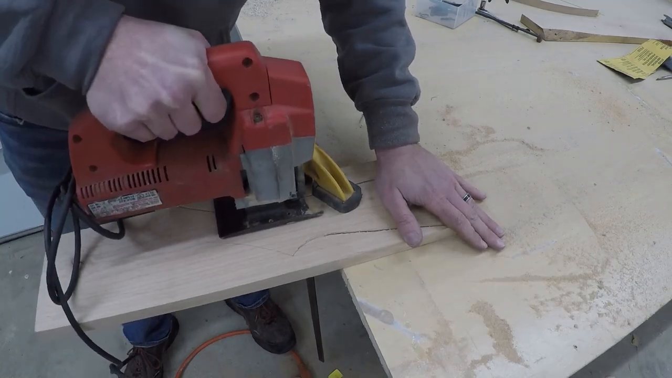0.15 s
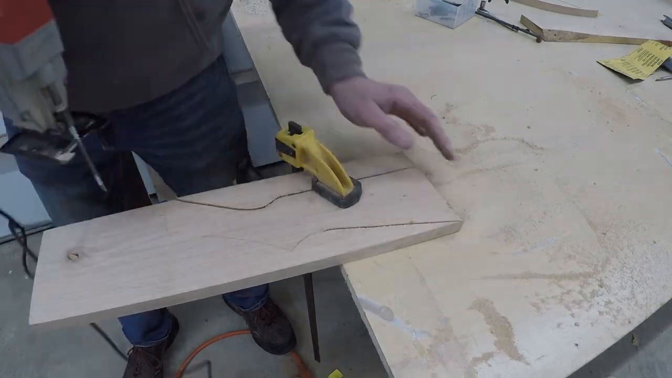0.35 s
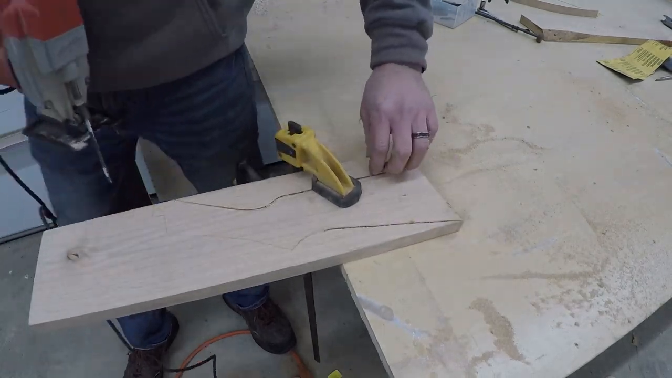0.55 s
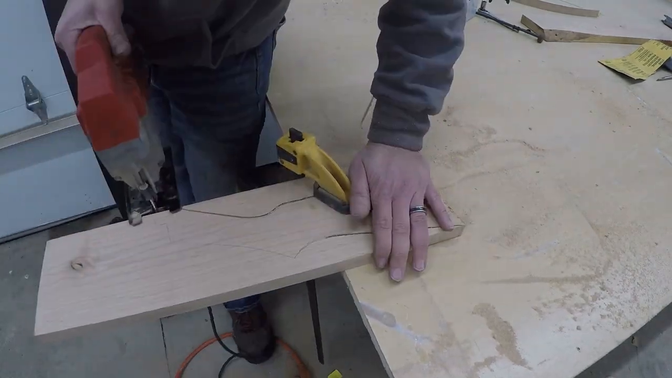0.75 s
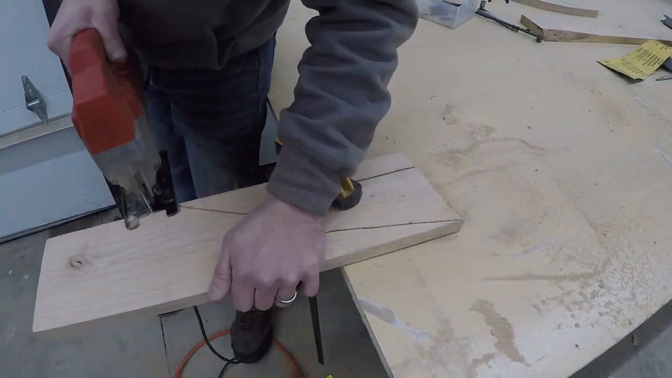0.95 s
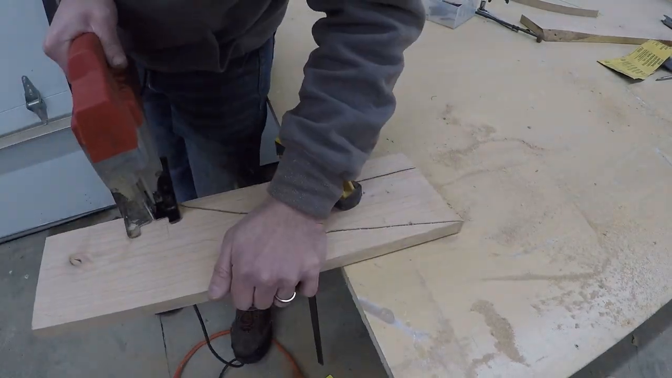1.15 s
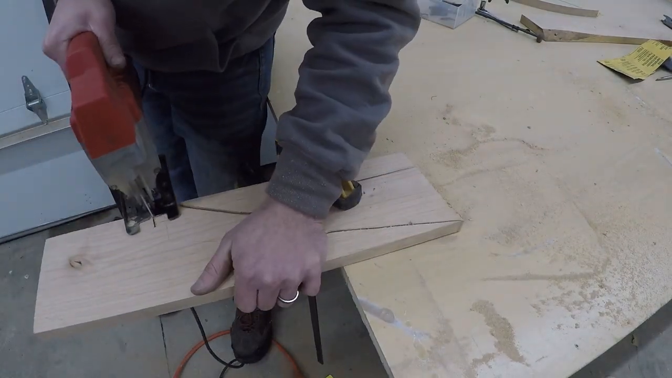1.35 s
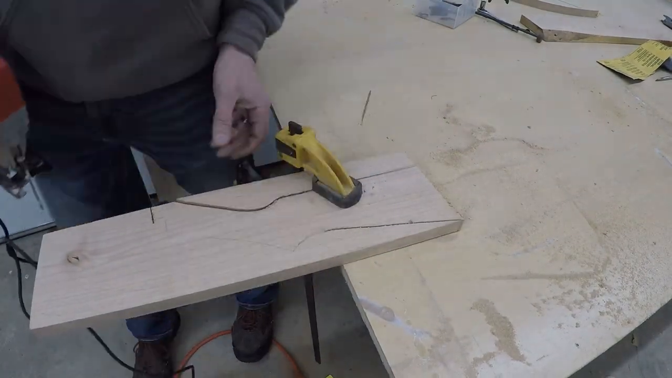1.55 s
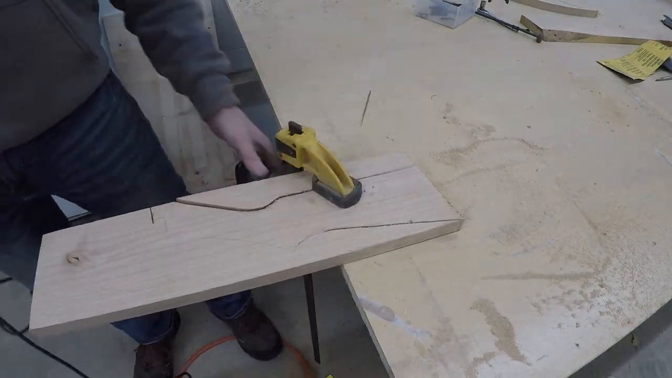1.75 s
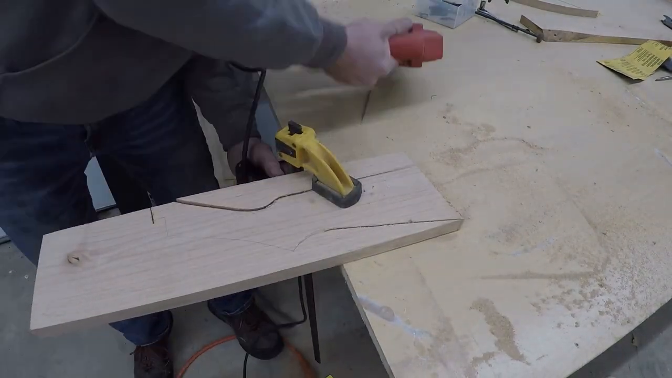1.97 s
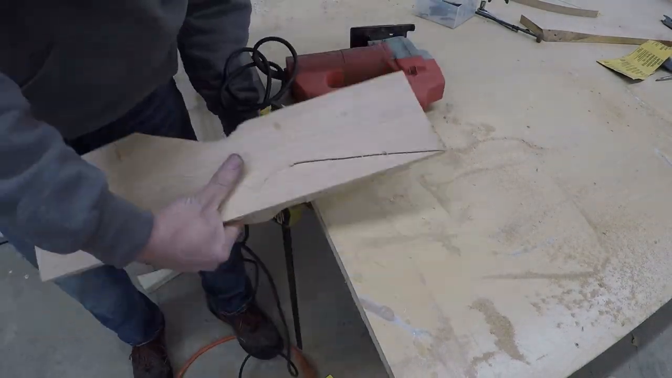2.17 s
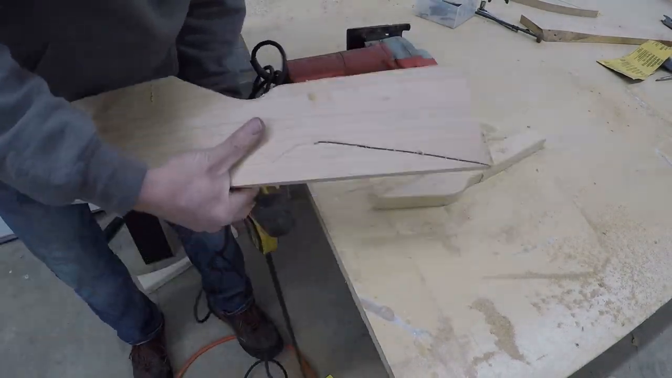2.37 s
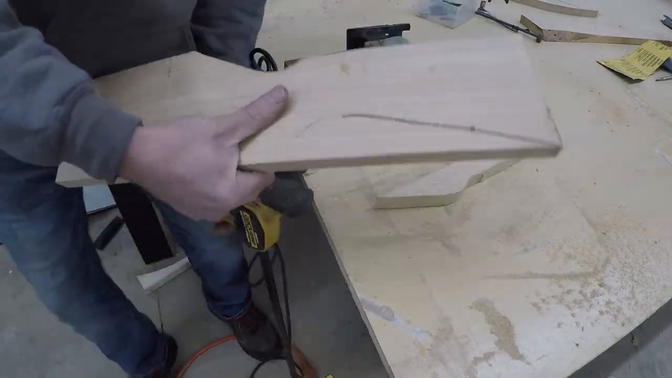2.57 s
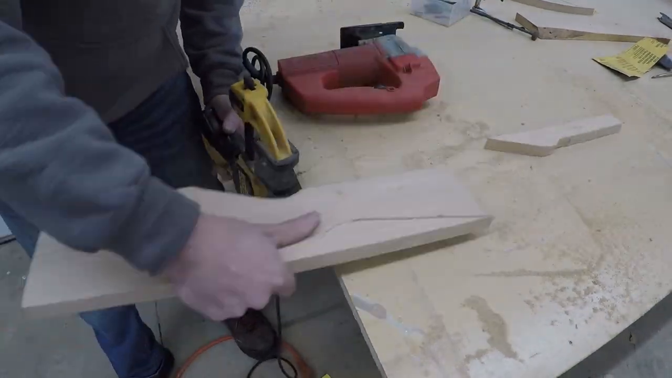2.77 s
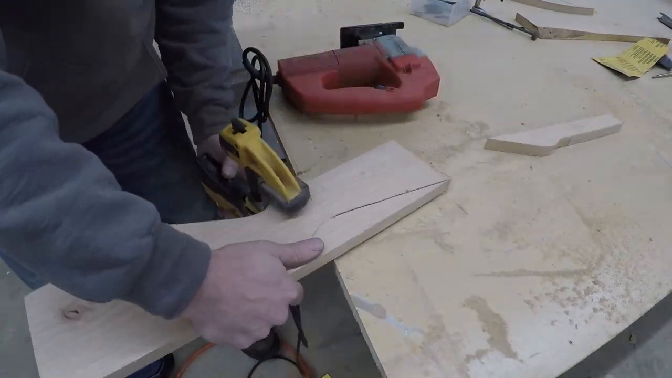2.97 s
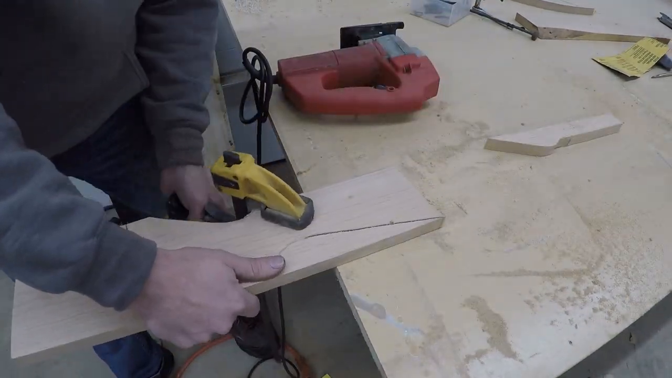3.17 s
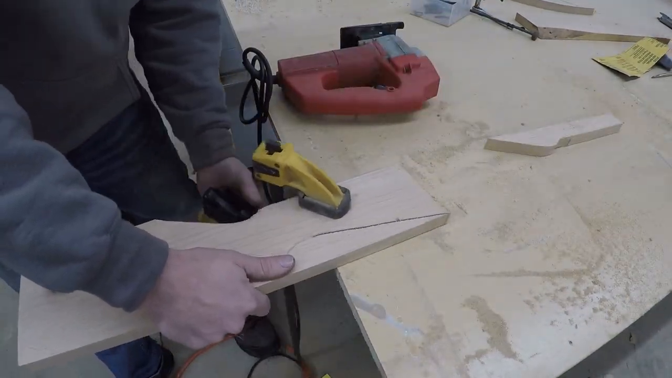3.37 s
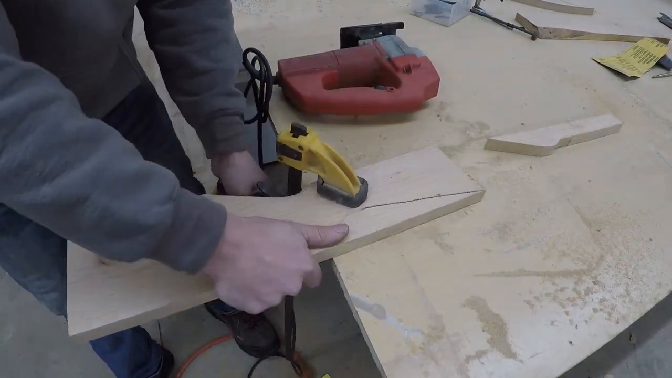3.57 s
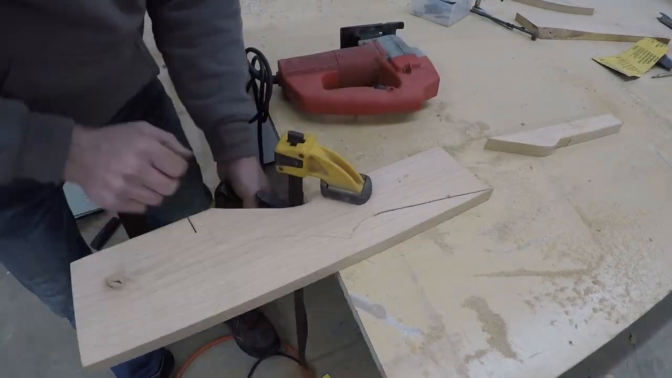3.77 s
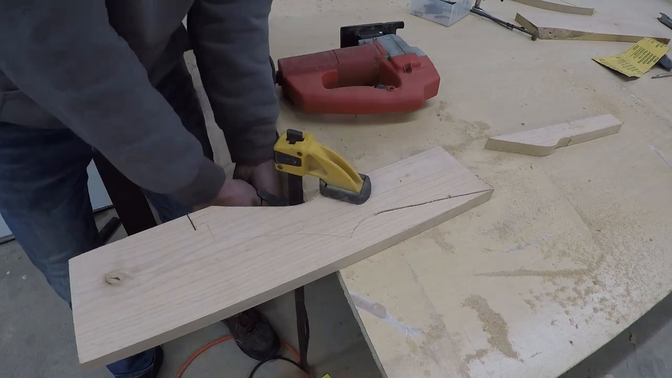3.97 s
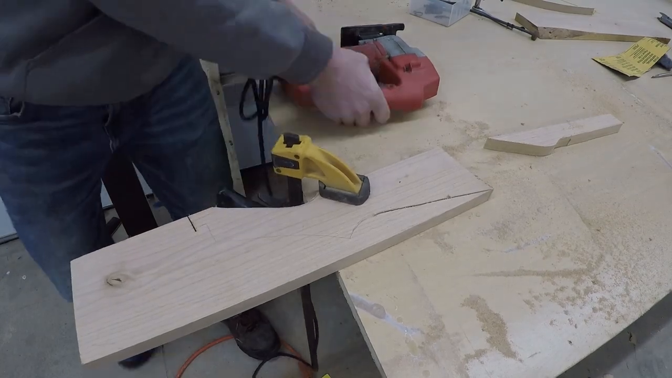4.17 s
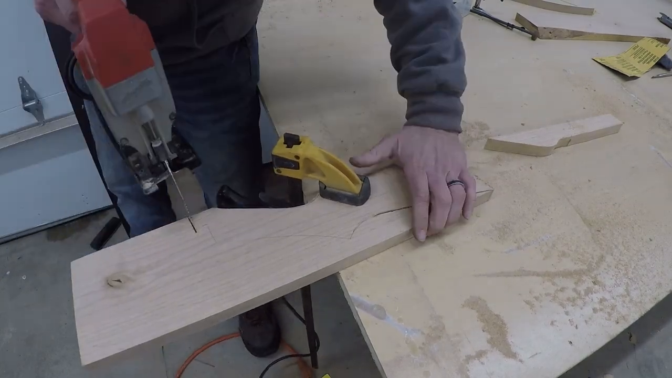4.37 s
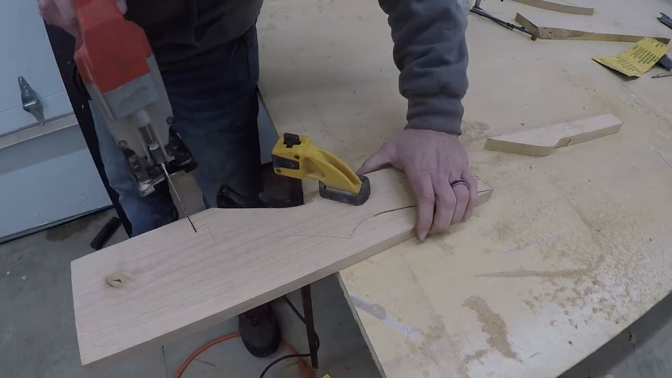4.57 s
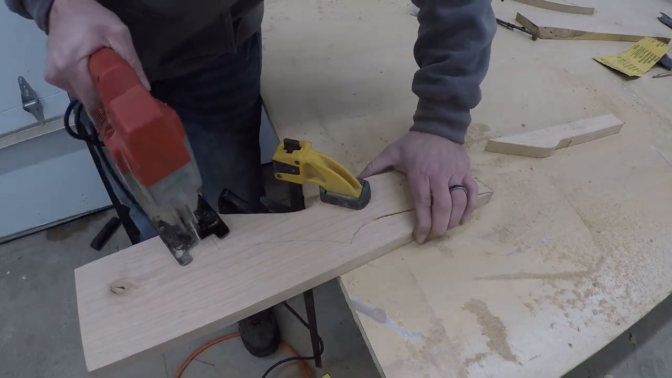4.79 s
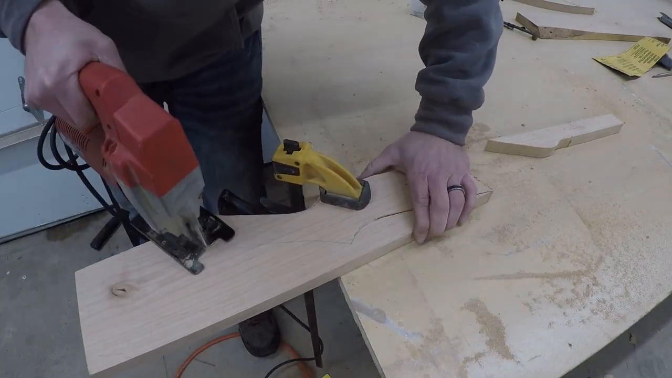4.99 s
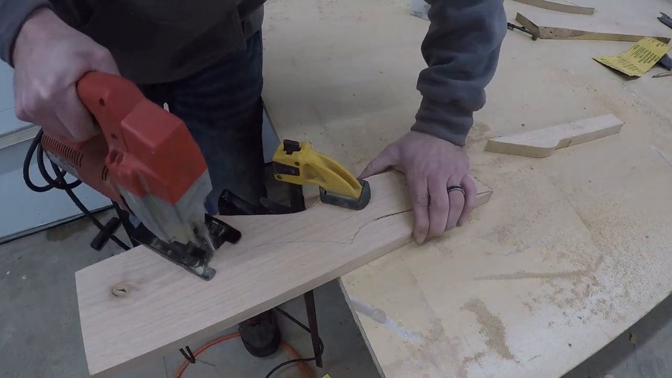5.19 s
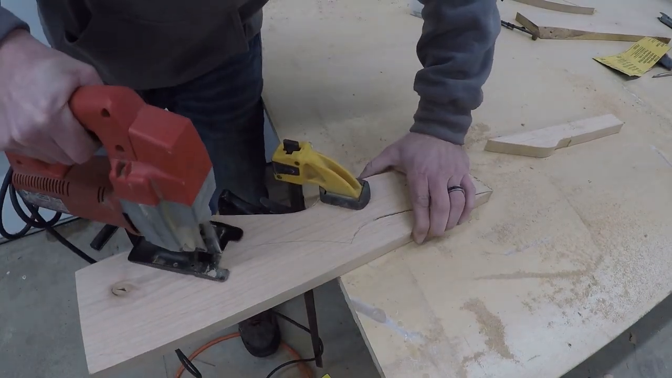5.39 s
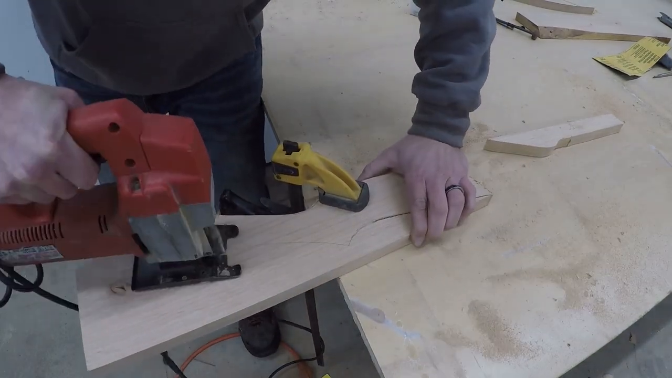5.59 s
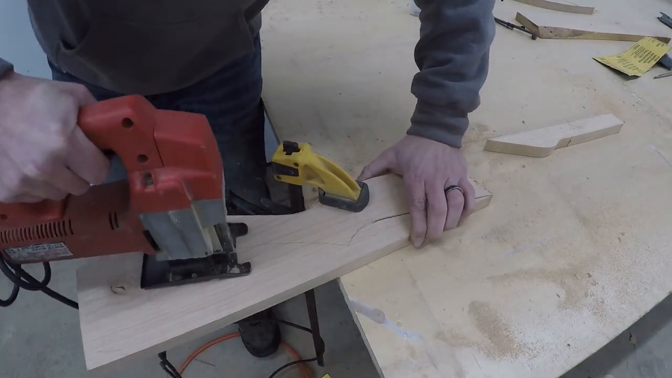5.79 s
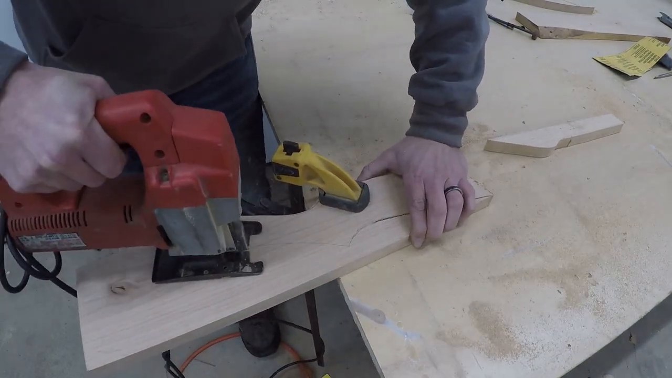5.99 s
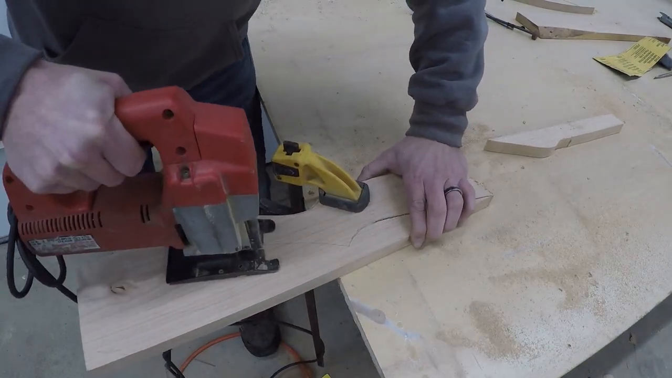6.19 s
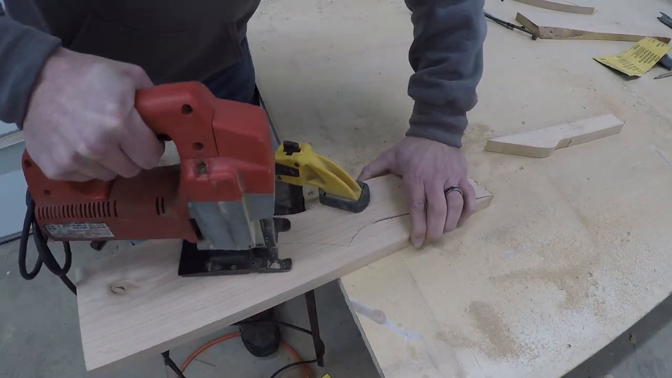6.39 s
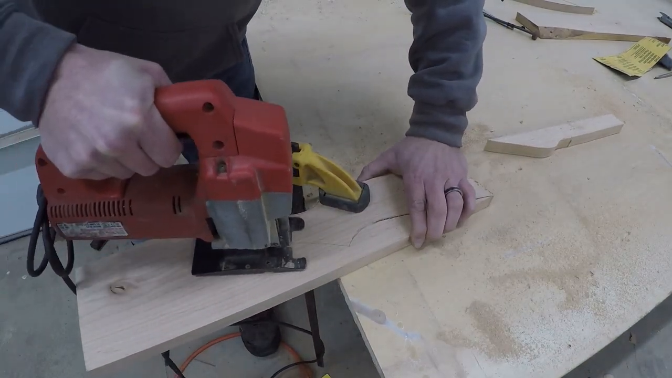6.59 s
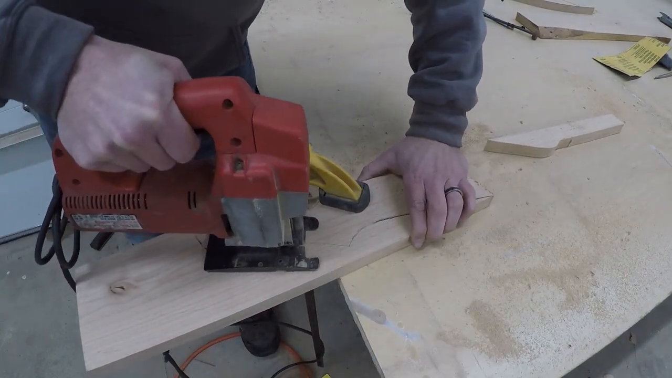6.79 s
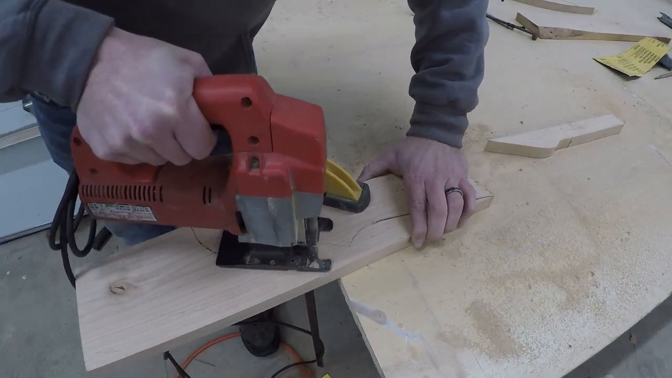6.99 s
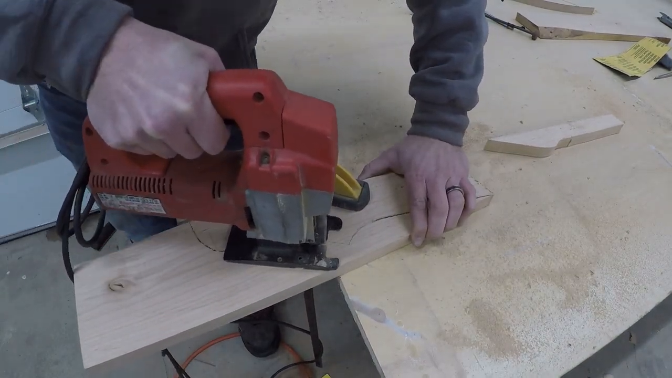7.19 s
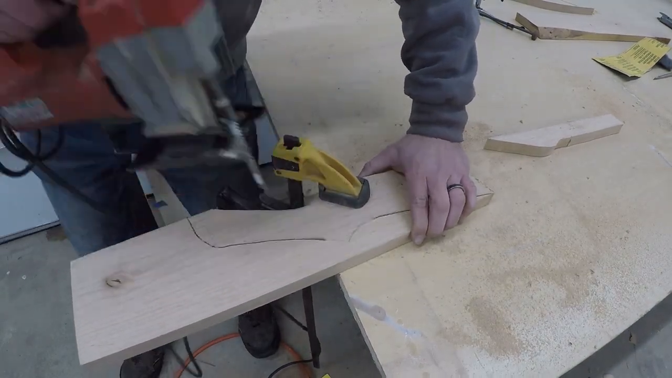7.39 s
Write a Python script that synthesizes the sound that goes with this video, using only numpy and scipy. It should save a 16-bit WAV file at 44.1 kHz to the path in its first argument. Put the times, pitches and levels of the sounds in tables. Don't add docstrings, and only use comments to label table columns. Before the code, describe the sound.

Close, dry, mono-like workshop sound, speeded up. A jigsaw is already cutting, a buzzing tone near 360 hertz with strong overtones and bright hiss; it is released at 0.2 s and slides down, with a firm wooden bump at 0.34. Light touches and clicks lead to a short cut from 1.0 to 1.44, coasting down until 1.65. Small clicks follow, then two loud hard knocks near 2.05 as the saw is put down. Clamp clicks come at 2.3, a heavy padded board thud at 2.66, ringing metal ticks around 2.8, then rustling, sliding wood and scattered knocks to 4.7, with a tiny rough squeak at 4.0 and a faint distant engine drone from about 3.7. The last cut starts at 4.77, snags harshly and sags in pitch around 5.3 to 5.75, then steadies into an even buzz. Released at 7.3, it drops away with a small bump near 7.4.

```python
import sys
import numpy as np
from scipy import signal
from scipy.fft import rfft, irfft, next_fast_len
from scipy.io import wavfile

SR = 44100
rng = np.random.default_rng(int(sys.argv[2]) if len(sys.argv) > 2 else 0)


def linear_from_db(decibels):
    return 10 ** (np.asarray(decibels, float) / 20)


def int16_out(signal):
    q = np.round(np.clip(np.atleast_2d(signal).T, -1, 1) * 32767)
    wavfile.write(sys.argv[1], SR, q.astype(np.int16))


N = 328545
TIME = np.arange(N) / SR
BAR_HZ, BAR_WIDTH_HZ = 1466, 24


def rms_one(x):
    return x / np.sqrt(np.mean(x ** 2) + 1e-20)


def in_time(rows):
    s, *columns = np.transpose(rows)
    return [np.interp(TIME, s, c) for c in columns]


def bumps(rows):
    rows, coarse = np.array(rows), TIME[::32]
    bells = np.exp(-((coarse - rows[:, :1]) / rows[:, 1:2]) ** 2)
    return [np.interp(TIME, coarse, c) for c in rows[:, 2:].T @ bells]


def drift(rate):
    r = np.exp(-80 * np.pi * rate / SR)
    white = rng.standard_normal(N // 40 + 2002)
    slow = signal.lfilter([1], [1, -2 * r, r * r], white)[2000:]
    return np.interp(np.arange(N) / 40, np.arange(len(slow)), rms_one(slow))


def coloured(x, spectrum):
    hz, level_db = np.transpose(spectrum)
    size = next_fast_len(N)
    grid = np.log(np.arange(size // 2 + 1) * SR / size + 1)
    gain = linear_from_db(np.interp(grid, np.log(hz), level_db, -90, -90))
    return rms_one(irfft(rfft(x, size) * gain, size)[:N])


def resonance(x, hz, width_hz):
    r = np.exp(-np.pi * width_hz / SR)
    feedback = [1, -2 * r * np.cos(2 * np.pi * hz / SR), r * r]
    return signal.lfilter(np.array([1, 0, -1]) * (1 - r * r) / 2, feedback, x)


# t/s, f/Hz, level/dB
ENGINE_PASSES = [
    [(3.66, 308, -69), (3.814, 280.0, -61), (4.12, 309, -66)],
    [(4.9, 295, -61), (5.2, 268, -58), (5.52, 235, -58)],
]
# f/Hz, level/dB
ROOM_COLOUR = [(18, -48), (80, -8), (153, 13.5), (540, 3), (666, -10.5), (889, -16), (1190, -37),
               (1500, -19), (16000, -26)]


def workshop():
    drone = 0
    for rows in ENGINE_PASSES:
        hz, level_db = in_time(rows)
        passing = np.clip(np.minimum(TIME - rows[0][0], rows[-1][0] - TIME) / 0.045, 0, 1)
        turn = 2 * np.pi * np.cumsum(hz) / SR
        drone += passing * linear_from_db(level_db + 3 + 3.5 * drift(20)) * np.sin(turn)
    white = rng.standard_normal((2, N))
    hum = linear_from_db(-76) * rms_one(resonance(white[1], 965, 13))
    room = linear_from_db(-62.5 + 1.3 * drift(8)) * coloured(white[0], ROOM_COLOUR)
    return room + hum + drone


# t/s, level/dB
RUBBING = [(.38, -69.5), (1.0, -64), (1.75, -67), (2.7, -71.5), (2.95, -56.5), (3.25, -63.5), (3.62, -54.5),
           (3.72, -63.5), (4.1, -57), (4.4, -66), (4.62, -66), (4.75, -51)]
# t/s, half width/s, extra brightness/dB
DRY_SLIDES = [
    (.75, 0.23, 6),
    (1.6, 0.11, 9),
    (4.1, 0.21, 11.5),
    (4.76, 0.078, 14),
]


def rustle():
    low_db, high_db = in_time(RUBBING)[0], -75 + bumps(DRY_SLIDES)[0]
    grains = rng.standard_normal((2, N)) * linear_from_db(4.6 * drift(63))
    dull = [(120, -14), (350, 7), (680, -3), (1000, 0), (1500, -7.0), (2200, -13.0), (5000, -43.5)]
    low = linear_from_db(low_db - 1.5) * coloured(grains[0], dull)
    high = linear_from_db(high_db) * coloured(grains[1], [(1200, -14), (3000, 8), (16000, 1.0)])
    return low + high + 1.4 * resonance(low, BAR_HZ, 2 * BAR_WIDTH_HZ)


# t/s, f/Hz, level/dB
PAD_SLIP = [
    (3.985, 1336, -85),
    (3.993, 1318, -39),
    (4.0, 1164, -53),
    (4.012, 1186, -39.5),
    (4.022, 1180, -43),
    (4.035, 1120, -87),
]
PAD_OVERTONES = [-0.5, -1.5, -18, -12, -14.5]


def squeak():
    hz, level_db = in_time(PAD_SLIP)
    turn = 2 * np.pi * np.cumsum(hz * (1 + .035 * drift(150))) / SR
    overtones = sum(linear_from_db(d) * np.sin((k + 1) * turn) for k, d in enumerate(PAD_OVERTONES))
    return linear_from_db(level_db - 2.5 + 5.0 * drift(120)) * overtones


def crack(noise, fall):
    t = np.arange(len(noise)) / SR
    spike = np.sign(noise) * np.exp(-t / 0.00022)
    wash = signal.sosfilt(signal.butter(1, 8500, fs=SR, output="sos"), noise * fall ** .8)
    high_pass = signal.butter(2, 1900, "high", fs=SR, output="sos")
    return signal.sosfilt(high_pass, 0.9 * spike + 0.28 * wash)


# f/Hz, width/Hz, level/dB
BAR_RINGS = [
    (2756, 70, -25),
    (5157, 80, -33),
]


def knock(body_hz, crack_db, t60, bar_db, draw):
    t = np.arange(len(draw) - 12) / SR
    noise, t60 = draw[12:], np.clip(t60, .015, .25)
    fall = linear_from_db(-60 * t / t60) + 0.11 * linear_from_db(-60 * t / (2.06 * t60))
    ratios = np.array([.7, .93, 1.08, 1.45]) * np.exp(0.044 * draw[:4])
    modes = sum(linear_from_db(-10 * abs(r - 1) - 150 * t * r) * np.sin(2 * np.pi * r * body_hz * t) for r in ratios)
    band = signal.butter(2, [0.76 * body_hz, 1.193 * body_hz], "band", fs=SR, output="sos")
    thud = signal.sosfilt(band, noise)
    contact = np.clip(t * body_hz / 0.59, 0, 1)
    body = (0.36 * modes + .24 * rms_one(thud)) * fall * contact
    body = .9 * body / np.abs(body).max()
    strike = noise * linear_from_db(-60 * t / .012)
    bar = resonance(strike, BAR_HZ, BAR_WIDTH_HZ)
    bar = bar + sum(linear_from_db(d) * resonance(strike, hz, w) for hz, w, d in BAR_RINGS)
    return body + linear_from_db(crack_db) * crack(noise[::-1], fall) + linear_from_db(bar_db) * bar / np.abs(bar).max()


# t/s, peak level/dB, body f/Hz, crack level/dB, fall by 60 dB/s
SAW_BUMPS = [
    (0.336, -21, 760, -15, 0.049),
    (0.481, -47, 382, 1.5, 0.055),
    (0.559, -43.5, 480, 0, 0.055),
    (0.681, -46, 324, 10, 0.063),
    (0.713, -35, 633, -11, 0.075),
    (0.734, -46, 960, 13, 0.063),
    (0.894, -35, 463, -8, 0.048),
    (0.919, -40, 635, -11, 0.046),
    (7.418, -33, 885, -6, 0.084),
]
# t/s, peak level/dB, body f/Hz, crack level/dB, fall by
# 60 dB/s
OWN_CRACK_KNOCKS = [(1.909, -30, 610, -10.5, 0.052), (2.016, -44, 625, 1, 0.12), (2.047, -9, 930, -3, 0.073),
                    (2.077, -11, 1351, 0, 0.075), (2.514, -47.5, 592, 3.5, 0.075), (2.55, -40, 1096, 2.5, 0.12),
                    (3.465, -24, 1072, 0.5, 0.072), (3.579, -40.5, 301, -14, 0.26), (3.836, -40, 566, -6, 0.048),
                    (3.999, -36, 1195, -0.5, 0.14), (4.08, -30, 1945, 4, 0.057), (4.236, -28, 950, 4, 0.08),
                    (4.693, -41, 510, -0.5, 0.24), (4.726, -25, 448, -10, 0.044),
                    (4.773, -31.5, 676, -13, 0.081)]
# t/s, peak level/dB, body f/Hz, fall by 60 dB/s
DULL_BLOWS = [(1.836, -35, 650, 0.07), (2.658, -11, 620, 0.052), (3.079, -39, 900, 0.06),
              (3.119, -27.5, 984, 0.053), (3.33, -45, 527, 0.061), (3.776, -41, 880, 0.12),
              (3.878, -44, 527, 0.08), (3.917, -39.5, 903, 0.1), (3.94, -36.5, 846, 0.058),
              (4.175, -32, 1130, 0.062), (4.382, -26, 470, 0.055), (4.478, -40.5, 431, 0.044),
              (4.553, -44, 417, 0.03),
              (.309, -32, 480, .04), (.325, -33, 150, .09), (.483, -50, 3000, .04),
                 (.561, -50, 3000, .04), (.826, -50, 950, .05), (.895, -48, 3000, .04),
                 (.923, -47, 2900, .04), (.984, -31, 1300, .05), (.992, -32, 800, .04),
                 (1.69, -46, 2100, .03), (2.135, -38, 900, .09), (2.155, -42, 1500, .05),
                 (7.412, -35, 170, .12), (2.66, -28, 2700, .05), (7.395, -40, 600, .04),
                 (1.597, -48, 2500, .05), (1.717, -46, 700, .06), (1.81, -50, 750, .06),
                 (2.047, -17, 2900, .05), (2.078, -15, 780, .06), (2.514, -46, 3050, .07),
                 (2.55, -43, 3050, .09), (2.66, -19, 400, .07), (2.9, -46, 500, .04), (3.12, -32, 330, .04),
                 (3.38, -46, 450, .05), (3.396, -34, 300, .05), (3.635, -44, 300, .06)]
# t/s, peak level/dB, crack level/dB, fall by 60 dB/s, bar level/dB
CLAMP_CLICKS = [(1.689, -46, 3, 0.04, -10), (2.257, -47, -1, 0.07, -8), (2.272, -44, -26, 0.059, -4),
                (2.319, -27, 5, 0.037, -10), (2.336, -27, 2, 0.07, -3), (2.738, -52, -12, 0.056, 2),
                (2.752, -52, -15, .05, 2), (2.787, -30, -14, 0.08, -3), (2.818, -36, 8, 0.06, 4),
                (2.855, -32, -10, 0.1, 5), (2.865, -38, -8, .05, 6), (2.88, -38, -10, .06, 5),
                (2.954, -48, -15, 0.044, -5), (2.979, -40, -7, 0.078, -3), (3.056, -54, -20, 0.07, 6),
                (3.103, -46, -15, .05, -2), (3.2, -54, -8, .1, -3), (3.312, -54, -6, .06, -3),
                (3.395, -37, -16, 0.15, -2), (3.55, -50, -10, .08, -3), (3.605, -50, -10, .1, 0),
                (3.638, -47, -14, .1, 0), (3.703, -56, -12, .08, 0), (4.145, -46, -6, .06, -8),
                (4.251, -25, -15, 0.07, -12), (4.265, -32, -5, .07, -4), (4.33, -50, -3, .07, -8),
                (4.61, -52, 0, .06, 0)]


def blows():
    soft = [(s, db, hz, -49 - 0.36 * db, t60) for s, db, hz, t60 in DULL_BLOWS]
    rows = [(*row, -46 - 0.58 * row[1]) for row in OWN_CRACK_KNOCKS + soft]
    rows += [(s, db, 1000, *rest) for s, db, *rest in CLAMP_CLICKS]
    return [(*row, -45) for row in SAW_BUMPS] + sorted(rows)


# t/s, peak level/dB
SMALL_TICKS = [
    (1.7278, -34),
    (2.427, -44),
    (2.799, -28),
    (2.8714, -34),
    (4.07, -47),
]


def knocks():
    rows = blows()
    size = SR // 4
    out, draws = np.zeros(N + size), rng.standard_normal((len(rows) + len(SMALL_TICKS), size + 12))
    for (s, peak_db, *colour), draw in zip(rows, draws):
        out[round(s * SR):][:size] += linear_from_db(peak_db) * knock(*colour, draw)
    for (s, peak_db), draw in zip(SMALL_TICKS, draws[::-1]):
        out[round(s * SR):][:size] += linear_from_db(peak_db) * crack(draw[12:], linear_from_db(-60 * TIME[:size] / 0.04))
    return signal.sosfilt(signal.butter(2, 220, "high", fs=SR, output="sos"), out[:N])


# pressed t/s, released t/s, silent t/s, coasting time constant/s, tooth hiss level/dB
CUTS = [
    (-1, .224, .42, .135, -43),
    (0.9863, 1.44, 1.645, .165, -38),
    (4.765, 7.315, 8, .125, -35.5),
]


def trigger():
    return sum(np.clip((TIME - a) / 0.012, 0, 1) * np.clip((b - TIME) / 0.023, 0, 1) for a, _, b, *_ in CUTS)


# t/s, f/Hz (strokes per second)
BLADE_SPEED = [(0.0, 361), (.13, 362.3), (.224, 369.5), (1.0, 357), (1.18, 362), (1.27, 362), (1.43, 371),
               (4.8, 339), (4.95, 351.5), (5.07, 357), (5.25, 366), (5.8, 360), (6.15, 360.6), (6.3, 358.8),
               (6.6, 360), (6.97, 364.3), (7.14, 364.2), (7.3, 373)]
# t/s, half width/s, change of f/Hz
SPEED_SAGS = [
    (5.015, .035, -11),
    (5.348, .03, -15),
    (5.428, .045, -29),
    (5.562, .037, -44),
    (5.63, .06, -24),
    (5.72, .06, -22),
    (5.88, .07, -4),
]
# t/s, half width/s, level/dB
SWUNG_AWAY = [
    (1.575, 0.071, -6.5),
]


def motor_run():
    rate = in_time(BLADE_SPEED)[0] + bumps(SPEED_SAGS)[0]
    onset_db, fade_db, tooth_db = np.zeros((3, N))
    for pressed, released, silent, coast_s, level_db in CUTS:
        on = (TIME >= pressed) & (TIME < silent)
        lack = 280 * np.exp(-np.clip(TIME - pressed, 0, 9) / .0195)
        running = (rate - lack) * np.exp(-np.clip(TIME - released, 0, 9) / coast_s)
        lost = rate - lack - running
        attack_db = -25 * np.clip(1 - (TIME - pressed) / 0.041, 0, 1)
        stall_db = -.3 * np.clip(lost - 105, 0, 999)
        onset_db += on * (attack_db - 0.05 * lost + stall_db)
        fade_db += on * -21 * np.clip(1 - (silent - TIME) / 0.051, 0, 1)
        tooth_db += np.where(on, level_db, 0)
        rate = np.where(on, running, rate)
    dip_db = -10.5 * (TIME > 5.58) * np.exp(-np.abs(TIME - 5.58) / .075)
    return rate, onset_db, fade_db + bumps(SWUNG_AWAY)[0] + dip_db, tooth_db


# level/dB (unused for the teeth, whose level comes with each cut), dB per dB of
# speed, dB per dB of crunch, dB per dB of bite
TOOTH_RULE = (0.1, 0.47, 0.47, .35)
BLADE_RULE = (-32.7, 1.06, -0.31, 0.07)
MOTOR_RULE = (-32, 0.54, .05, -0.02)
CHIP_RULE = (-44.5, 0.4, 1.05, .1)


def hiss_levels(rate, fade_db, tooth_db, crunch_db, extra_bite_db):
    speed_db = 20 * np.log10(np.where(np.gradient(rate) < 0, rate / 360, 1))
    levels = []
    for base_db, by_speed, by_crunch, by_bite in [(tooth_db, *TOOTH_RULE[1:]), BLADE_RULE, MOTOR_RULE, CHIP_RULE]:
        answer_db = by_speed * speed_db + by_crunch * crunch_db + by_bite * extra_bite_db
        levels.append(base_db + fade_db + .7 * drift(2.5) + answer_db)
    tooth_db, blade_db, motor_db, chip_db = levels
    muffle_db = -0.9 * np.clip(TIME - 5.9, 0, 1.3)
    return tooth_db + muffle_db, blade_db, motor_db + muffle_db, chip_db


# f/Hz, level/dB
TOOTH_COLOUR = [(3000, -26), (3900, -29), (5000, 4), (6000, 10.5), (6600, 10.5), (7500, -49)]
BLADE_COLOUR = [(5500, -25), (6500, -7), (7400, -1), (7900, 2.5), (8400, 1), (9300, -1.5), (10500, -19)]
MOTOR_COLOUR = [(8500, -27), (9700, 3), (10700, 0.5), (11300, 2.5), (12200, 2), (13800, 1.5), (14800, 2),
                (16500, -1.5)]
CHIP_COLOUR = [(30, -14.5), (110, -25), (300, -14), (600, 4.5), (900, 7.5), (1500, 4), (2500, 4.5),
               (4000, 5.5), (5000, 9)]


def hiss(turn, tooth_db, blade_db, motor_db, chip_db):
    swell = 1 + .25 * np.sin(turn) + 0.17 * np.sin(2 * turn + 2.0)
    white = rng.standard_normal((4, N)) * swell
    tooth = linear_from_db(tooth_db - 3.8 + 1.0 * drift(25)) * coloured(white[0], TOOTH_COLOUR)
    blade = linear_from_db(blade_db - 2.3 + 0.73 * drift(25)) * coloured(white[3], BLADE_COLOUR)
    motor = linear_from_db(motor_db + 0.58 * drift(25)) * coloured(white[1], MOTOR_COLOUR)
    chips = linear_from_db(chip_db + 1.6 * drift(21)) * coloured(white[2], CHIP_COLOUR)
    return tooth + blade + motor + chips


# multiple of stroke, level/dB over blade hiss, dB per tilt
TILTED_WHINES = [(13, -27, 20.5), (15, -19, 3), (16, -24, 12), (18, -22, 5), (19, -21, 17), (19.5, -21, 6),
                 (20, -21, 4), (22, -16, -3)]
# multiple of stroke, level/dB over blade hiss
GEAR_LINES = [(2.5, -38), (3.5, -33), (5.5, -30), (11, -30), (11.5, -25), (12, -25), (14, -24), (14.5, -24),
              (15.5, -19.5), (17, -23), (17.5, -22), (18.5, -22), (20.5, -21), (21, -25), (21.5, -20),
              (22.5, -20), (23, -23), (24, -22)]
# multiple of stroke, level/dB over blade hiss
ROLLER_LINES = [
    (7.125, -26),
    (9.125, -21),
]


def gear_lines(gear_db, tilt):
    lines = [(k, gear_db + d + b * tilt + 3 * drift(12)) for k, d, b in TILTED_WHINES]
    lines += [(k, gear_db + d + 3 * drift(5)) for k, d in GEAR_LINES]
    not_seated_db = -200 * np.clip(5.9 - TIME, 0, 1)
    return lines + [(k, gear_db + d + not_seated_db) for k, d in ROLLER_LINES]


# multiple, level/dB over the bite, dB per tilt, dB per overhang
BOARD_ORDERS = [(2, 0.7, 12.5, -2.5), (3, 7.5, -2.5, -6.5), (4, -1, -11, 2.5), (5, -7.5, 3, 5.5),
                (6, -9.5, -3, -2), (7, -6.5, 1, .3), (8, -2.5, 10, 6), (9, -6, -3, 1.5), (10, -11, 7, 5.5)]


def board_orders(bite_db, snag_db, coasting_db, tilt, tip, overhang):
    lines = []
    for k, d, a, b in BOARD_ORDERS:
        level_db = bite_db + d + a * tilt + b * overhang
        if k > 4.5:
            level_db = level_db + coasting_db - (1 - 0.71) * snag_db + 2 * drift(4)
        else:
            level_db = level_db + a * tip
        lines.append((k, level_db))
    return lines


# t/s, housing shake level/dB, bite level/dB, tilt -1..1, board overhang -1..1
SAW_HOLD = [(0.0, -51, -46, 0.04, 0.004), (0.2, -45, -49.5, 0.14, 0.16), (1.06, -56.3, -43.5, -0.08, -0.07),
            (1.15, -59.2, -45, 0.48, -0.023), (1.33, -52.0, -45, 0.42, 0.3),
            (1.432, -46.6, -53, -0.27, 0.78), (4.83, -40, -44.5, 0.52, 0.13), (4.9, -38, -50.7, 0.55, -1.0),
            (4.97, -41.5, -51.3, 0.42, -0.37), (5.13, -40.9, -48.8, 0.15, -0.61),
            (5.3, -41.5, -48, 0.06, 0.15), (5.6, -58.5, -51, -0.18, 0.23), (5.93, -53.6, -47, -0.13, -0.88),
            (6.14, -52.3, -45, -0.18, -0.25), (6.535, -49.3, -49, -0.99, 0.18),
            (6.77, -47, -49, 0.42, 0.16), (7.17, -46, -48.1, 0.17, 0.64), (7.28, -42.5, -61, 0.46, 0.84)]
# t/s, half width/s, bite level/dB, crunch level/dB, change of tilt
BLADE_SNAGS = [(.255, .015, 3, 0, .3), (.31, 0.0073, 0, 5, 0), (1.025, 0.026, 6, 3.5, -0.32),
               (1.4, 0.036, -5.5, 2, -0.1), (1.462, 0.014, 11.5, 3, 0.47), (1.55, 0.03, -6, -3, 0.1),
               (4.815, 0.021, 2, 1.5, -0.1), (5.0, 0.016, 14, 11, 0.14), (5.04, 0.033, -2, -4.5, -0.25),
               (5.345, .025, 8, 2, .25), (5.42, 0.026, 10, 3, 0.24), (5.48, 0.017, -10, -1, 0),
               (5.51, 0.019, 10, 5.5, 0.77), (5.53, 0.01, 9, 6, 0.35), (5.553, 0.012, 17, 11, .5),
               (5.574, .01, 14, 7, .3), (5.625, .01, -8, -2, 0), (5.66, .015, 4, 1, 0),
               (5.692, 0.016, 8.5, 3, -0.2), (5.725, 0.016, 10, 2, -.15), (5.76, .018, 8.5, 2, -.15),
               (5.805, .025, -8, 0, -0.1), (5.9, 0.037, -3.5, 0, 0.1), (7.32, 0.028, 11.5, 2.5, -0.57),
               (7.37, 0.036, 6, 2, 0)]
# t/s, half width/s, shake level/dB
HOUSING_JOLTS = [
    (1.02, .015, 11),
    (5.04, .03, -5),
    (5.35, .025, -9),
    (5.5, 0.023, 13),
    (5.555, .015, 23.5),
    (5.71, .045, 9),
    (7.31, .02, 3),
]


def jigsaw():
    rate, onset_db, fade_db, tooth_db = motor_run()
    shake_db, held_db, tilt, overhang = in_time(SAW_HOLD)
    snag_db, crunch_db, tip = bumps(BLADE_SNAGS)
    extra_bite_db = held_db + 48
    levels = hiss_levels(rate, fade_db, tooth_db, crunch_db, extra_bite_db)
    loose = np.clip(np.maximum((rate - 366.5) / 4, (330 - rate) / 30), 0, 1)
    jitter = (.0007 + .012 * loose + .03 * (rate < 320)) * drift(60)
    turn = 2 * np.pi * np.cumsum(rate * (1 + jitter)) / SR
    coasting_db = -.4 * np.clip(332 - rate, 0, 200)
    gear_db = 2.6 + levels[1] + coasting_db + .3 * extra_bite_db
    lines = [(1, shake_db + bumps(HOUSING_JOLTS)[0] + 1.56 * onset_db)]
    lines += board_orders(held_db + snag_db + onset_db, snag_db, coasting_db, tilt, tip, overhang)
    lines += gear_lines(gear_db, tilt)
    tone, runs = np.zeros(N), trigger() > 0
    for k, level_db in lines:
        waver_db = (1.4 + 2.9 * loose * (k > 1)) * drift(40)
        wave = np.sin(k * turn[runs] + rng.uniform(0, 2 * np.pi))
        tone[runs] += linear_from_db((level_db + 3 + waver_db)[runs]) * wave
    return tone + hiss(turn, *levels)


def scene():
    held = trigger()
    mono = held * jigsaw() + knocks() + squeak() + linear_from_db(-6.5 * held) * (rustle() + workshop())
    return np.vstack([mono, mono])


def band_limit(x):
    return signal.sosfilt(signal.butter(12, 17070, fs=SR, output="sos"), x)


def record(dry):
    rounded = .45 * np.tanh(dry / 0.44)
    low_pass = signal.cheby2(12, 32, 16000, fs=SR, output="sos")
    mix = signal.sosfilt(low_pass, rounded)
    return band_limit(mix)


dry = scene()
out = record(dry)
int16_out(out)
```